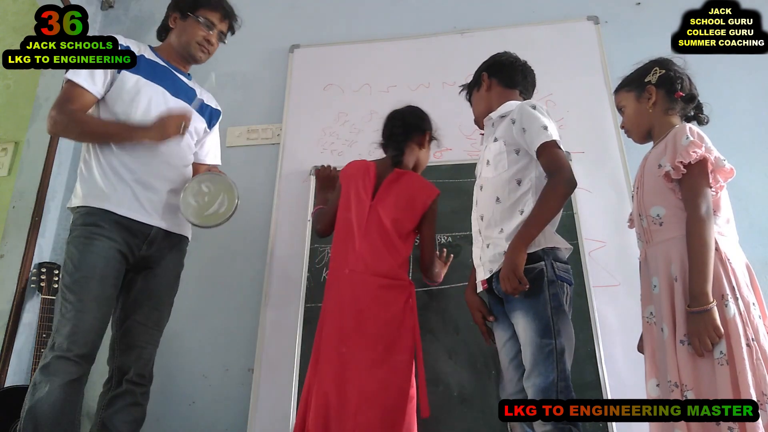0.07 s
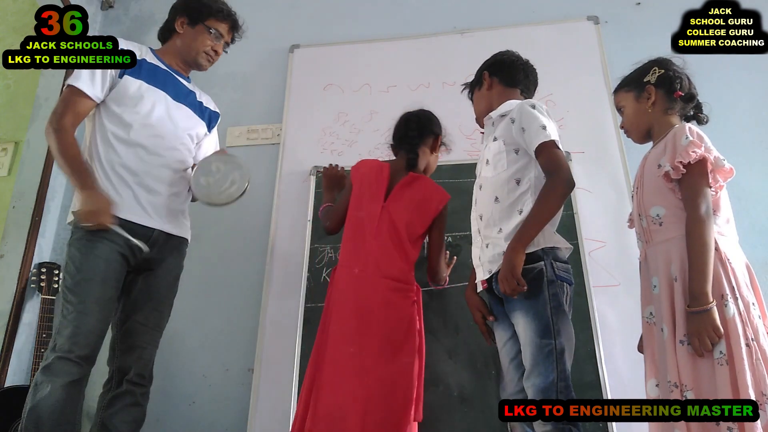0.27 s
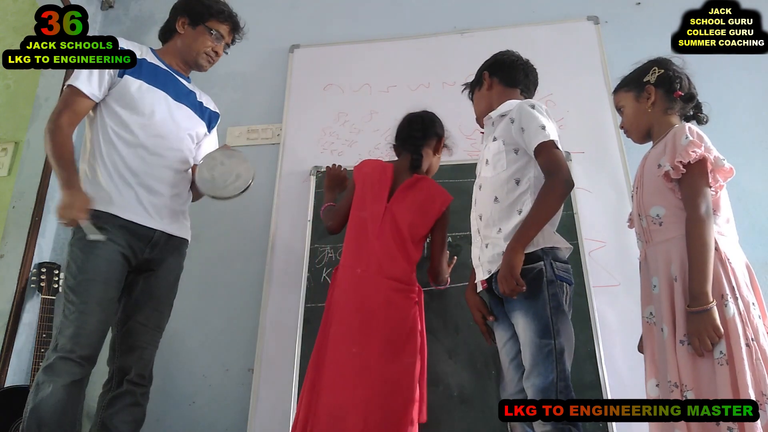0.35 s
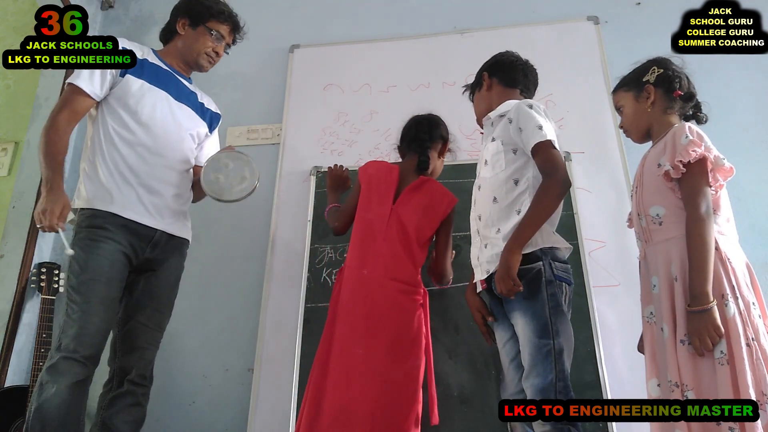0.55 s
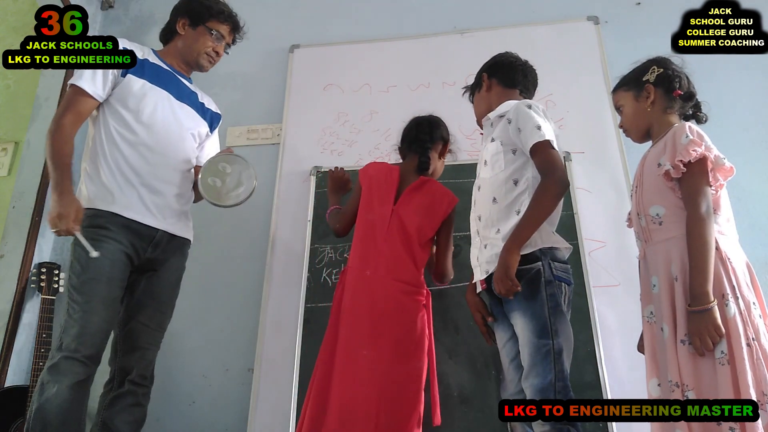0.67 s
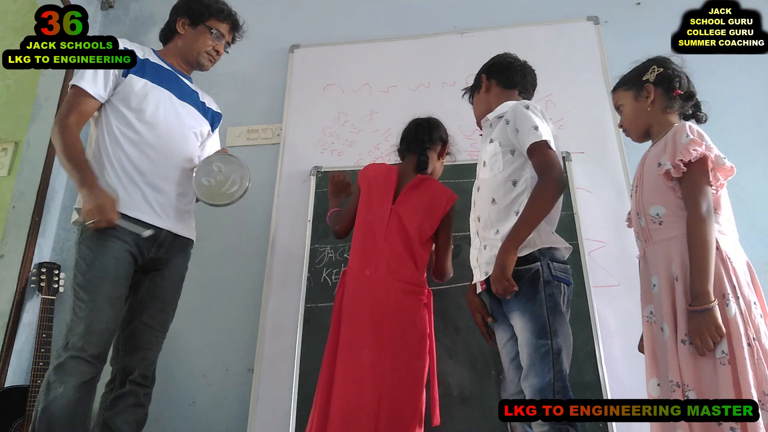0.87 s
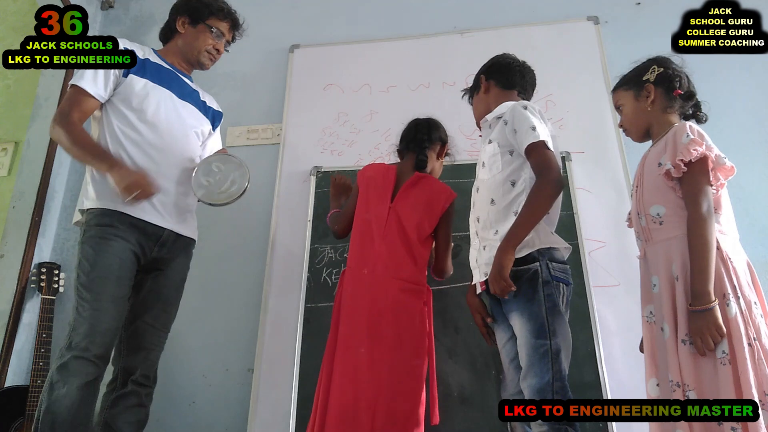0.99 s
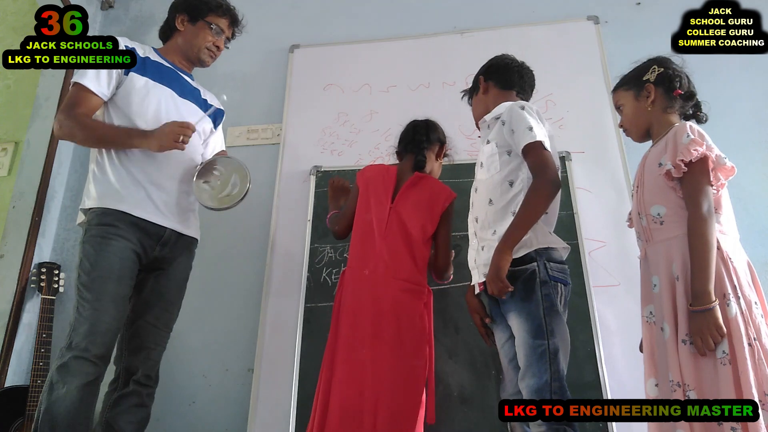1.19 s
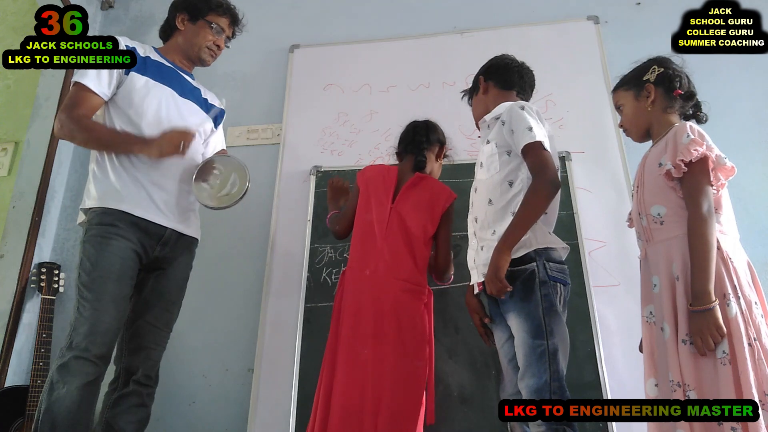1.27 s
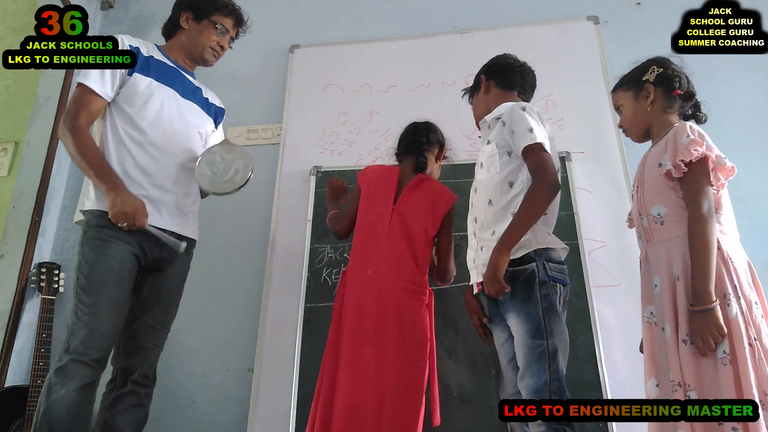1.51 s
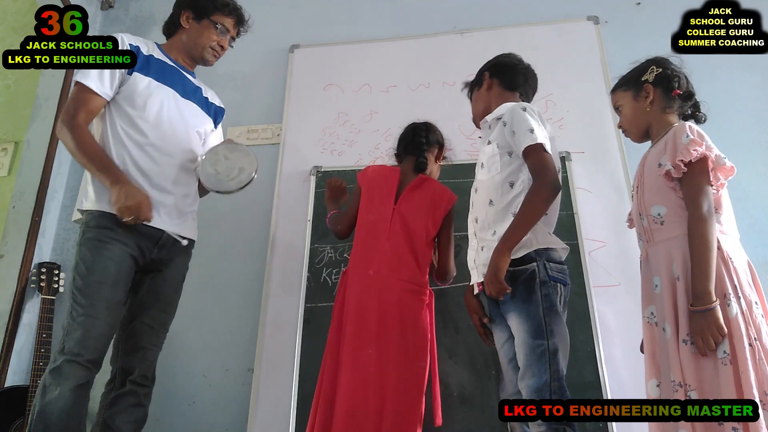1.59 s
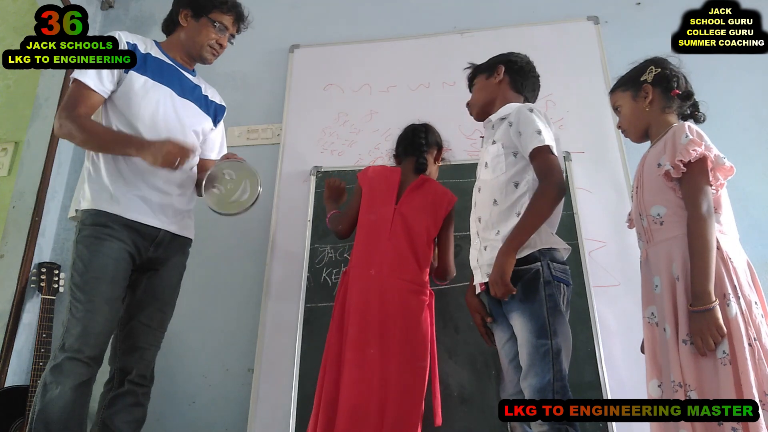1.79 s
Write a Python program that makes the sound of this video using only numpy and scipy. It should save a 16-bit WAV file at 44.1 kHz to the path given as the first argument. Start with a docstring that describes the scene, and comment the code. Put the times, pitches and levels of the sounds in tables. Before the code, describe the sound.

A metal disc struck once with a stick gives a bright clang and rings on.

```python
"""In the faint rumble and hiss of a bare classroom, a stick strikes a hand-held metal disc once.
The contact cracks and excites a crowd of close modes: a dense bright clang that dies in half a second.
Sparse low modes beat on, and a noise suppressor cuts each partial short as it nears the room rumble.
One mode sings to the end, louder and softer in each channel as the disc sways."""
import sys
import numpy as np
from scipy import signal
from scipy.fft import irfft
from scipy.io import wavfile
from scipy.ndimage import uniform_filter1d

SR = 44100
rng = np.random.default_rng(int(sys.argv[2]) if len(sys.argv) > 2 else 0)


def master_out(mix):
    """Clip the mix to full scale and print it as 16-bit PCM to the path in sys.argv[1]."""
    frames = np.transpose(np.atleast_2d(mix))
    ceiling = np.clip(frames, -1, 1)
    pcm = np.round(ceiling * 32767).astype(np.int16)
    wavfile.write(sys.argv[1], SR, pcm)


N = 81585
TIME = np.arange(N) / SR
BIN_HZ = np.maximum(np.arange(N // 2 + 1) * SR / N, 1)
STRIKE_S, ATTACK_S = .237, .0014
ROOM_PAN_DB, CHANNEL_PHASE_RAD = -7, 1.7

# Spectrum of the bright clang as heard, with narrow dips near 3020 and 3660 Hz:
# frequency_hz, relative_density_db
CLANG_SPECTRUM = [(100, -39), (200, -28.5), (320, -11.5), (400, -22.5), (650, -18.5), (800, 6),
                  (930, -13.5), (1150, -3.5), (1330, -15), (1650, -3), (2400, -9.5), (2880, 2.5),
                  (3020, -11.5), (3170, -1.5), (3500, -1.5), (3660, -8.5), (3800, 0), (4300, 3),
                  (5500, -0.5), (7300, 2.5), (9000, -1.5), (9700, -6), (13000, -10), (15500, -21)]


def from_db(db):
    """Amplitude grows tenfold for every 20 decibels."""
    return 10 ** (np.asarray(db) / 20)


def unit_rms(x):
    """Division by the root mean square gives unit power."""
    return x / np.sqrt(np.mean(np.abs(x) ** 2) + 1e-20)


def at_hz(table, hz, column=1):
    """Interpolation of a table column on a log-frequency axis."""
    table = np.array(table)
    return np.interp(np.log(hz), np.log(table[:, 0]), table[:, column])


def pan(left_over_right_db):
    """Constant-power panning: two gains with a given level difference."""
    return unit_rms(from_db([[left_over_right_db / 2], [-left_over_right_db / 2]]))


def complex_noise(shape):
    """Gaussian phasors: random amplitudes with uniform phases."""
    return rng.standard_normal(shape) + 1j * rng.standard_normal(shape)


def diffuse_spectrum(colour):
    """A diffuse field is partly coherent at two points for long waves, hardly at all for short ones."""
    # Likeness of left and right: frequency_hz, correlation
    coherence = [(30, .1), (120, .55), (500, 0.91), (1200, .03), (15000, .02)]
    mid, side = complex_noise((2, len(BIN_HZ)))
    alike = np.clip(at_hz(coherence, BIN_HZ), -1, 1)
    channels = np.sqrt(1 + alike) * mid + np.sqrt(1 - alike) * side * [[1], [-1]]
    return from_db(at_hz(colour, BIN_HZ)) * channels


def diffuse_noise(colour):
    """Fourier synthesis: random phases sum to steady stereo noise, here of unit power."""
    return unit_rms(irfft(diffuse_spectrum(colour), N))


def envelope(start_s, rise_s, t60_s):
    """A damped vibration builds up, then decays exponentially by 60 dB in t60_s."""
    age = np.maximum(TIME - start_s, 0)
    return (1 - np.exp(-age / max(rise_s, 1e-4))) * np.exp(-np.log(1000) * age / t60_s)


def room_rumble():
    """Stationary background noise: low rumble with a trace of hiss."""
    # Noise floor: frequency_hz, relative_density_db
    rumble_spectrum = [(25, -12), (45, -11), (65, 4.5), (100, 1), (160, -5.5), (300, -8.5), (600, -14.5),
                       (1100, -19), (1600, -20), (2500, -28.5), (6000, -31), (10000, -37.5), (15000, -48.5)]
    return from_db(-67.5) * pan(ROOM_PAN_DB) * diffuse_noise(rumble_spectrum)


def room_hiss():
    """Diffuse broadband noise, heard only where the suppressor is open."""
    # Hiss of the room: frequency_hz, relative_density_db
    hiss_spectrum = [(100, -19), (1000, -3.5), (1600, -2), (2500, -11.5), (6000, -20.5), (15000, -29)]
    return from_db(-57) * pan(ROOM_PAN_DB) * diffuse_noise(hiss_spectrum)


def room_waver(bandwidth_hz, control_hz=200):
    """Random modulation: low-passed phasors make amplitude and phase drift in each channel."""
    pole = np.exp(-2 * np.pi * bandwidth_hz / control_hz)
    drift = signal.lfilter([1], [1, -2 * pole, pole * pole], complex_noise((2, 1000)))
    settled = unit_rms(drift[:, 500:])
    return np.array([np.interp(TIME * control_hz, np.arange(len(side)), side) for side in settled])


def stick_impact():
    """A brief contact is broadband: the stick's touch, then a crack thickened by early reflections."""
    touch = from_db(-21.5) * envelope(STRIKE_S - .0022, rise_s=0, t60_s=.06)
    crack = from_db(-13.5) * envelope(STRIKE_S, ATTACK_S, t60_s=.23)
    return pan(-4) * (touch + crack) * diffuse_noise(CLANG_SPECTRUM)


def disc_clang(mode_spacing_hz=16, ripple_db=3.5, ripple_step_hz=60):
    """High modal density: close disc and room modes merge into a clang; the highest damp fastest."""
    # Ringing time of the close modes: frequency_hz, t60_s
    decay_times = [(200, .9), (700, 1.04), (1600, 1.244), (3500, .95), (7000, 0.77), (10000, 0.71),
                   (15000, .5)]
    has_mode = rng.random(len(BIN_HZ)) < SR / N / mode_spacing_hz
    knots_hz = np.arange(0, SR / 2, ripple_step_hz)
    ripple = from_db(ripple_db * np.interp(BIN_HZ, knots_hz, rng.uniform(-2, 2, len(knots_hz))))
    lines = diffuse_spectrum(CLANG_SPECTRUM) * has_mode * ripple
    edges_hz = np.geomspace(60, SR / 2, 19)
    clang = 0
    for low, high in zip(edges_hz, edges_hz[1:]):
        band = irfft(lines * (BIN_HZ >= low) * (BIN_HZ < high), N)
        t60_s = at_hz(decay_times, np.sqrt(low * high))
        clang += band * envelope(STRIKE_S, ATTACK_S, t60_s)
    return from_db(-15.5) * pan(-10) * clang / irfft(lines, N).std()


def disc_clear_modes(twin_gain=.9, twin_gap_hz=10, twin_above_hz=2000):
    """Modal superposition: each mode swells and decays; high ones beat with a weaker, detuned twin."""
    # Resolved modes: pitch_hz, relative_level_db, nominal_t60_s, swell_s, left_over_right_db
    modes = [(325.0, -44.0, 0.7, 0.03, -7.0), (516.0, -40.0, 1.3, 0.08, -10.0),
             (760.0, -34.0, 1.7, 0.03, 12.0), (812.0, -17.0, 0.62, 0.13, -7.0),
             (998.0, -34.0, 2.1, 0.14, -12.0), (1103.0, -22.0, 1.35, 0.06, -13.0),
             (1156.0, -26.0, 1.63, 0.01, -5.0), (1455.0, -31.0, 3.96, 0.008, 0.0),
             (1491.0, -22.0, 1.77, 0.095, -7.0), (1638.0, -25.0, 0.84, 0.022, -5.0),
             (1675.0, -18.0, 2.37, 0.15, -9.0), (1725.0, -26.0, 2.58, 0.01, -16.0),
             (2052.0, -34.0, 1.04, 0.003, -5.0), (2190.0, -25.0, 0.91, 0.12, -6.0),
             (2268.0, -28.0, 0.92, 0.041, -7.0), (2410.0, -33.0, 1.03, 0.003, -3.0),
             (2592.0, -30.0, 1.06, 0.056, 0.0), (2710.0, -33.0, 0.9, 0.008, 1.0),
             (2848.0, -19.0, 0.95, 0.088, 0.0), (2918.0, -31.0, 1.13, 0.035, -5.0),
             (3182.0, -23.0, 0.81, 0.012, -5.0), (3257.0, -30.0, 1.5, 0.013, -5.0),
             (3342.0, -23.0, 1.02, 0.12, -3.0), (3433.0, -10.0, 0.74, 0.12, -8.0),
             (3523.0, -24.0, 1.2, 0.044, -6.0), (3860.0, -22.0, 0.78, 0.12, -2.0),
             (4057.0, -27.0, 0.94, 0.027, -9.0), (4109.0, -22.0, 1.11, 0.014, -9.0),
             (4165.0, -17.0, 0.66, 0.12, -8.0), (4307.0, -20.0, 0.59, 0.04, -2.0),
             (4574.0, -25.0, 0.89, 0.008, -8.0), (4738.0, -25.0, 0.8, 0.021, -6.0),
             (4870.0, -22.0, 0.59, 0.028, -8.0), (4940.0, -27.0, 0.72, 0.026, -6.0),
             (5050.0, -31.0, 0.69, 0.003, -9.0), (5318.0, -23.0, 0.75, 0.004, -9.0),
             (5700.0, -29.0, 0.76, 0.003, -6.0), (5850.0, -20.0, 0.62, 0.12, -9.0),
             (6102.0, -16.0, 0.76, 0.003, -14.0), (6651.0, -14.0, 0.5, 0.077, -17.0),
             (6909.0, -26.0, 0.64, 0.003, -8.0), (7146.0, -21.0, 0.42, 0.037, -5.0),
             (7336.0, -23.0, 0.51, 0.003, -18.0), (7519.0, -22.0, 0.5, 0.003, -4.0),
             (7650.0, -26.0, 0.59, 0.003, -15.0), (7888.0, -35.0, 0.85, 0.003, -2.0),
             (8209.0, -20.0, 0.46, 0.025, -11.0), (8605.0, -31.0, 0.58, 0.003, -10.0),
             (8822.0, -25.0, 0.48, 0.023, -12.0), (8954.0, -19.0, 0.37, 0.12, -9.0),
             (9134.0, -28.0, 0.45, 0.018, -19.0), (9256.0, -33.0, 0.45, 0.003, -22.0),
             (10107.0, -34.0, 0.45, 0.003, -9.0), (11125.0, -30.0, 0.41, 0.009, -16.0),
             (11548.0, -36.0, 0.52, 0.003, -12.0), (11680.0, -33.0, 0.42, 0.014, -15.0),
             (11932.0, -35.0, 0.35, 0.003, -12.0), (12260.0, -30.0, 0.31, 0.034, -20.0),
             (12681.0, -42.0, 0.39, 0.003, -13.0), (13335.0, -34.0, 0.3, 0.011, -36.0)]
    ringing = 0
    for hz, level_db, nominal_t60_s, swell_s, pan_db in modes:
        # Longer waves differ less in phase between the channels.
        phase_gap = CHANNEL_PHASE_RAD * min(hz / 3000, 1) * rng.choice([-1, 1])
        phase = rng.uniform(0, 2 * np.pi) + np.array([[0], [phase_gap]])
        beat_hz = twin_gap_hz * rng.uniform(-1, 1)
        beat_phase = 2 * np.pi * (beat_hz * TIME + rng.random((2, 1)))
        twin = twin_gain * (hz > twin_above_hz) * np.exp(1j * beat_phase)
        phasor = np.exp(1j * phase) + twin + .15 * room_waver(bandwidth_hz=7.1)
        tone = (phasor * np.exp(2j * np.pi * hz * TIME)).real
        amplitude = from_db(level_db - .74) * envelope(STRIKE_S, swell_s, .96 * nominal_t60_s)
        ringing += pan(pan_db) * amplitude * tone
    return ringing


def disc_singing_mode(pitch_hz=1874.4):
    """Directivity: the lobes of the longest-lived mode sweep past the listener as the disc sways."""
    # Strength of the mode in each channel: time_s, left_db, right_db
    sway_levels = [(0.27, -37, -44), (0.33, -28, -38), (0.42, -38, -61), (0.5, -27, -26.5),
                   (0.68, -43.5, -24), (0.85, -40.5, -24), (1.0, -38, -30.5), (1.1, -35, -45.5),
                   (1.22, -39.5, -40), (1.5, -39.5, -43), (1.8, -38.5, -37.5)]
    time_s, left_db, right_db = np.transpose(sway_levels)
    gains = from_db([np.interp(TIME, time_s, left_db), np.interp(TIME, time_s, right_db)])
    tone = np.sin(2 * np.pi * pitch_hz * TIME + np.array([[0], [CHANNEL_PHASE_RAD]]))
    return gains * envelope(STRIKE_S, ATTACK_S, t60_s=np.inf) * tone


def scene():
    """Linear superposition: the sound of the struck disc adds to the hiss of the room."""
    return stick_impact() + disc_clang() + disc_clear_modes() + disc_singing_mode() + room_hiss()


def noise_suppressor(x, frame=1024, steepness=5):
    """Spectral gating: each narrow band is turned down when it falls below its threshold."""
    # Gate settings: frequency_hz, threshold_db, closed_gain_db
    gate = [(300, -71.5, -12), (526, -71, -29), (760, -72, -21), (1100, -68.5, -32.5), (1530, -65.5, -29),
            (2540, -71, -24.5), (3300, -78, -25), (4000, -73, -24.5), (6000, -77, -16.5), (9000, -71, -13),
            (14000, -76.5, -15)]
    framing = dict(nperseg=frame, noverlap=frame - frame // 4)
    hz, _, spectra = signal.stft(x, SR, **framing)
    threshold = from_db(at_hz(gate, hz[:, None] + 1))
    closed_gain = from_db(at_hz(gate, hz[:, None] + 1, column=2))
    power = uniform_filter1d(np.mean(np.abs(spectra) ** 2, axis=0), size=5, axis=0)
    excess = (np.maximum(power, 1e-20) / threshold ** 2) ** (steepness / 2)
    gain = (closed_gain + excess) / (1 + excess)
    _, gated = signal.istft(spectra * gain, **framing)
    return gated[:, :N]


def record(dry, stopband_hz=16157):
    """Gating, clipping and band limiting shape the sound; the steady rumble escapes the gate."""
    clipped = np.clip(noise_suppressor(dry) + room_rumble(), -1, 1)
    lowpass = signal.cheby2(16, 60, stopband_hz, fs=SR, output="sos")
    return signal.sosfilt(lowpass, clipped)


dry = scene()
out = record(dry)
master_out(out)
```